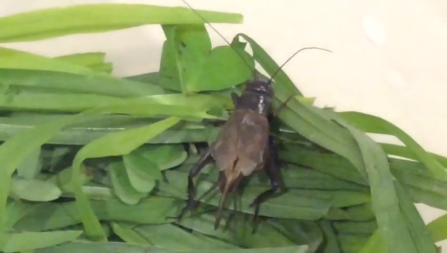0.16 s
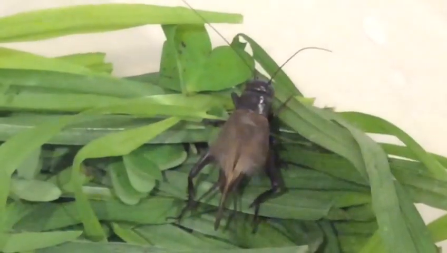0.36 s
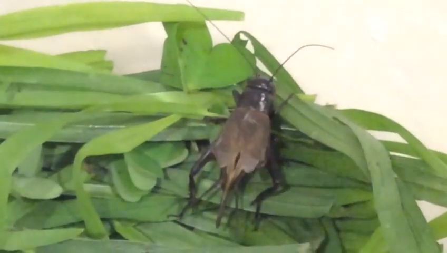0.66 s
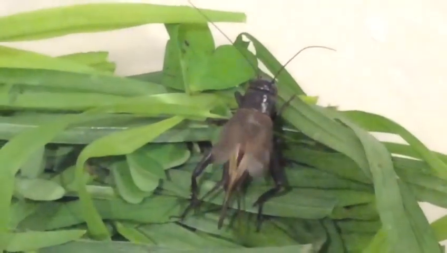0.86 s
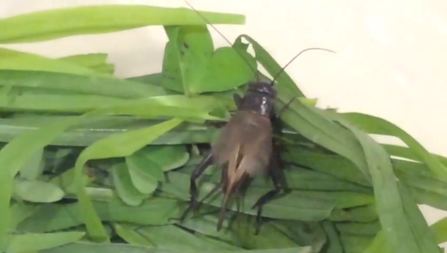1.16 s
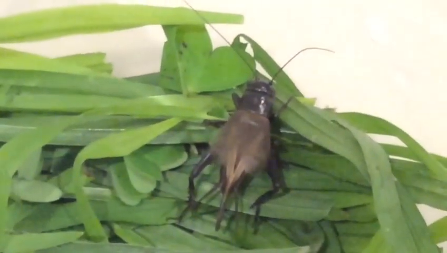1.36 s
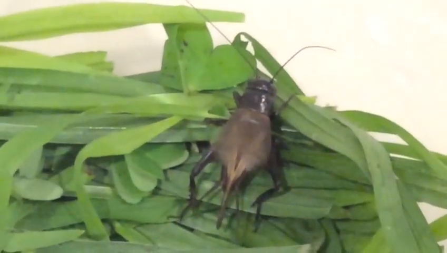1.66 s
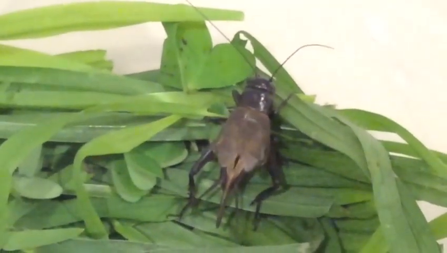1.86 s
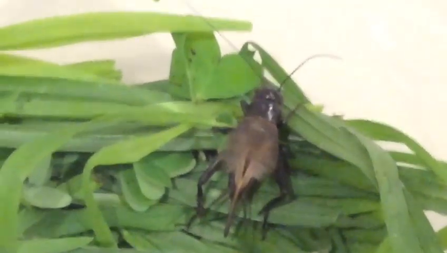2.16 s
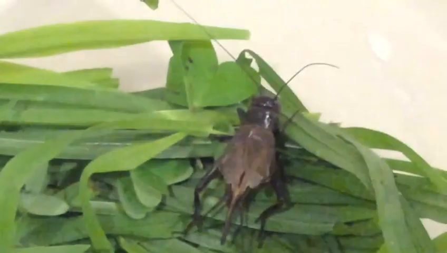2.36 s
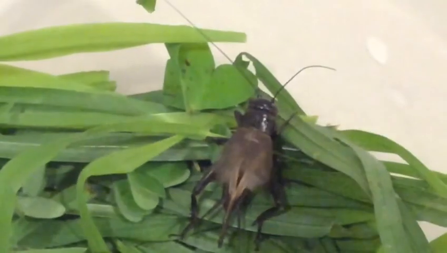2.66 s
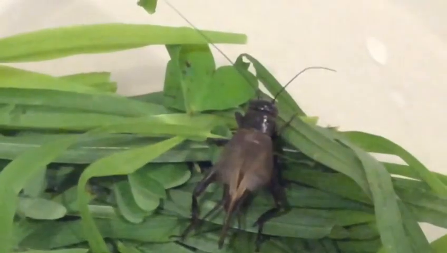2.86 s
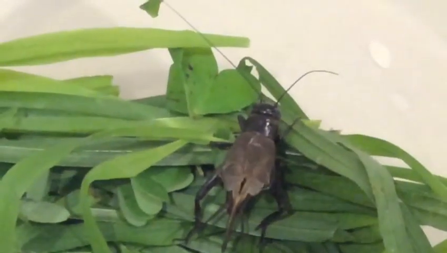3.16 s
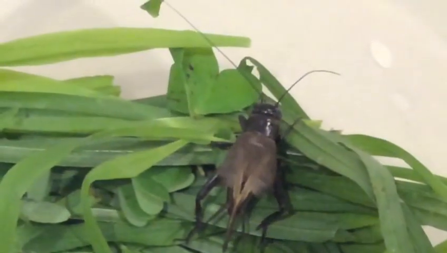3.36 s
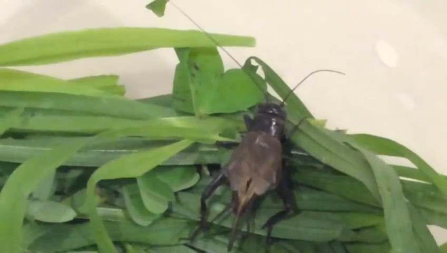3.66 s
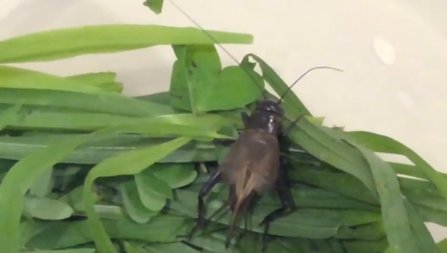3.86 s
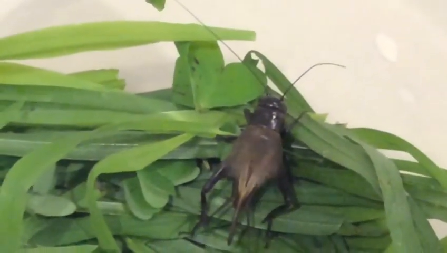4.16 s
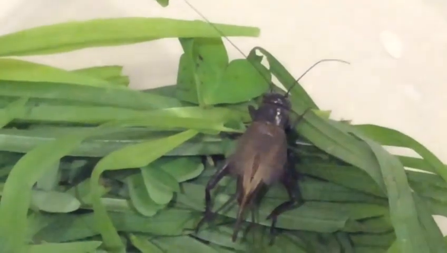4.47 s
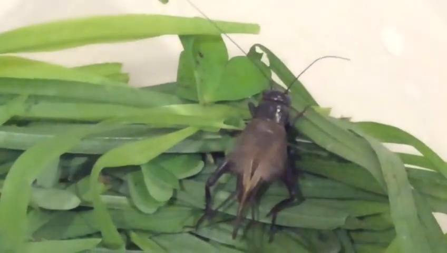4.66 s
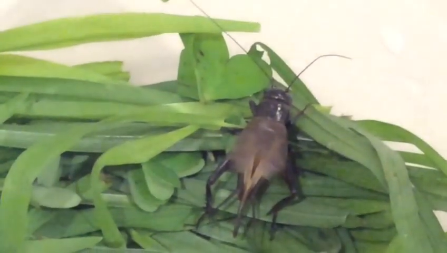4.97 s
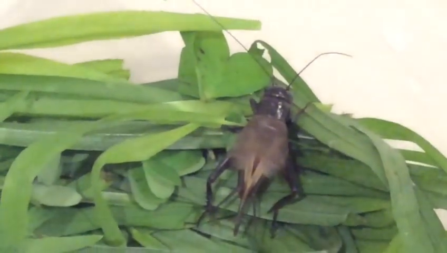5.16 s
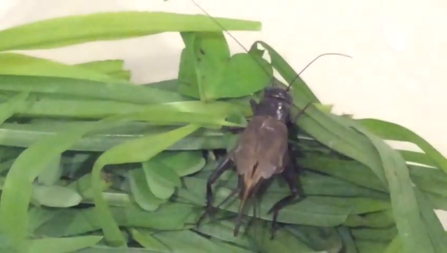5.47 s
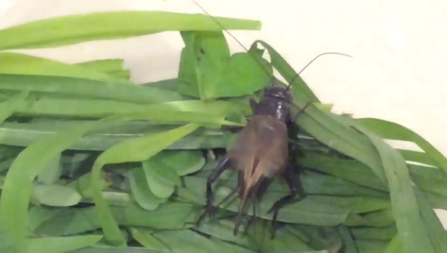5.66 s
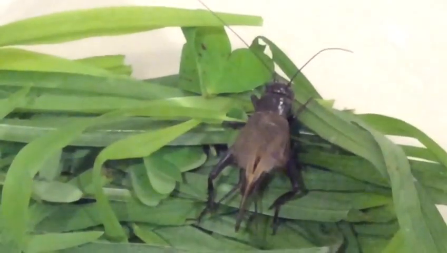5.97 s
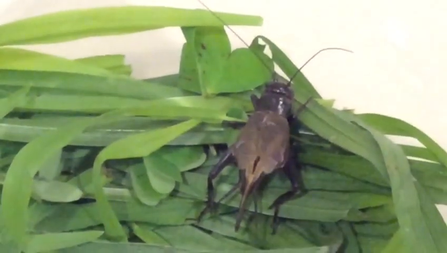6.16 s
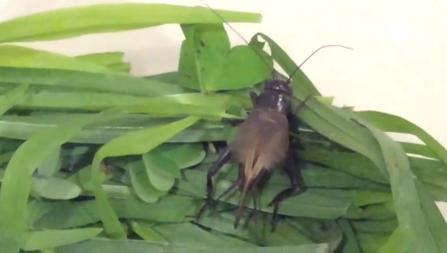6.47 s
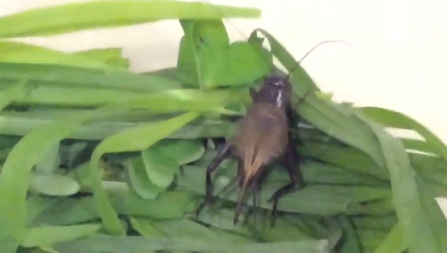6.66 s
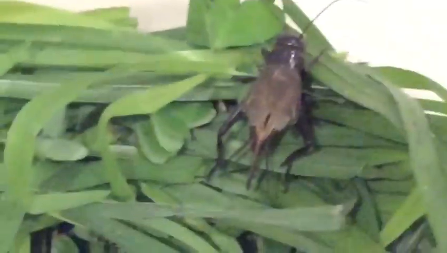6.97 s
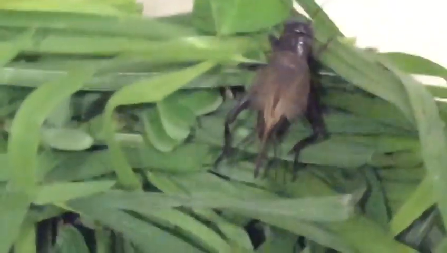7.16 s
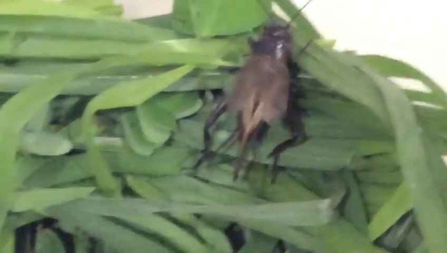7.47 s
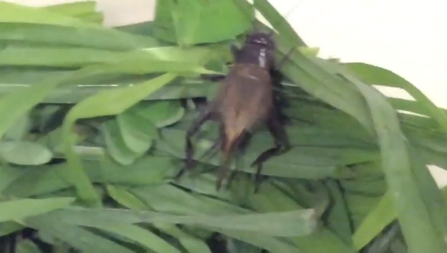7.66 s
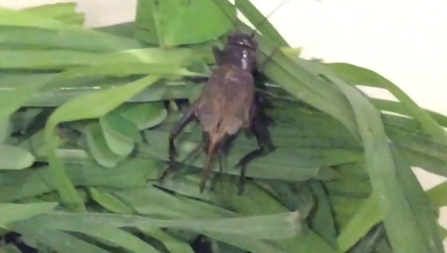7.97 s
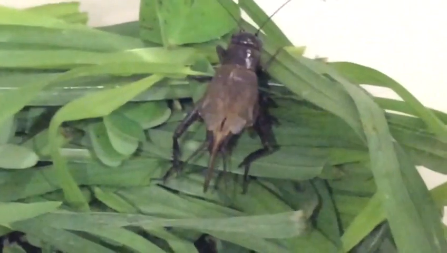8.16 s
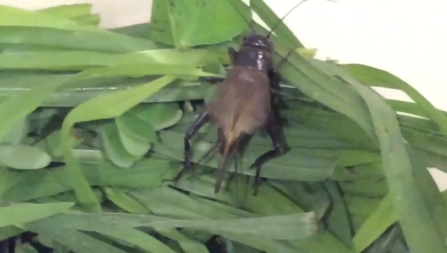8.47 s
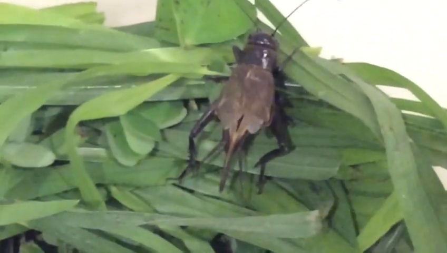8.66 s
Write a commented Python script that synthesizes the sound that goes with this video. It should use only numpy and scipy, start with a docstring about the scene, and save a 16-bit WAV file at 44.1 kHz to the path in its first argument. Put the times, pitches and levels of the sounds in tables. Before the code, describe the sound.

From 0.3 seconds a lone cricket sings close to a hand-held microphone in a tub indoors. Its high, clear tone, around 3.5 kilohertz, comes in short trills of rapid pulses, each drooping slightly in pitch with a beating shimmer and dry, scratchy edge. Trills begin softly, swell over the first pulses, and stop with a faint tub ring and room tail. Longer trills start around 0.85, 3.9 and 7.1 seconds, with slight changes of pace; others are shorter and evenly paced, separated by gaps of about a third of a second. Soft dull hand knocks occur between 0.6 and 2.2, one near 3.6. From 6.7 the case is rubbed; around 7.1 the song grows noticeably louder, with a low finger creak and more bumps until 8.6. The last trill runs from about 8.2 to 8.5, then fading echo, slight rubbing, quiet hum and room hiss.

```python
"""Cricket in a tub

A field cricket sings in a tub indoors, close to a hand-held microphone.
Each wing stroke drags a scraper over a toothed file: a gliding tone sounds through two wing resonances that beat.
Strokes come in trills with a dry rasp; the tub and the room ring faintly after them.
The hand knocks, rubs and creaks on the microphone's case, over soft room noise, a hum and a faint steady ring."""
import sys
import numpy as np
from scipy import signal
from scipy.fft import rfft, irfft, next_fast_len
from scipy.io import wavfile

SR = 44100
rng = np.random.default_rng(int(sys.argv[2]) if len(sys.argv) > 2 else 0)


def unload_wav(signal):
    """Save mono or channel-first audio to the path in sys.argv[1] as 16-bit WAV at rate SR, clipped to [-1, 1]."""
    wavfile.write(
        sys.argv[1],
        SR,
        np.round(np.clip(np.atleast_2d(signal).T, -1, 1) * 32767).astype(np.int16),
    )


N = 388521
TIME = np.arange(N) / SR   # seconds

# runs of evenly paced wing strokes; a trill is one run, or several when the cricket changes pace
# (levels are before the trims in cricket(), the rest before the chance and opening changes):
# first_stroke_end_s, last_stroke_end_s, strokes, peak_db, top_tooth_rate_hz, rate_fall_hz, skid_db, rasp_db
STROKE_RUNS = [(.303, .355, 2, -23.5, 3470, 343, -56, -54.5), (0.425, .596, 4, -25, 3544, 408, -46, -56),
               (0.854, 0.932, 2, -21, 3590, 565, -38, -59.5),
               (1.013, 1.463, 7, -23, 3709, 552, -26.5, -60.5), (1.515, 1.693, 5, -24, 3548, 480, -50, -55),
               (1.968, 2.327, 9, -23.5, 3508, 386, -44, -52),
               (2.639, 2.953, 8, -24.5, 3524, 420, -43.5, -52.5),
               (3.289, 3.563, 7, -24, 3500, 458, -45, -55), (3.91, 3.994, 2, -23.5, 3500, 406, -31, -53),
               (4.069, 4.515, 7, -24.5, 3702, 543, -30, -58.5),
               (4.570, 4.79, 6, -25, 3568, 480, -42, -53.5), (5.008, 5.366, 9, -24, 3528, 404, -43, -53.5),
               (5.690, 6.049, 9, -25, 3535, 430, -41.5, -55), (6.352, 6.681, 8, -24, 3540, 473, -42, -50.5),
               (6.736, 6.798, 2, -21.5, 3590, 516, -40, -62), (7.102, 7.181, 2, -16, 3648, 450, -36, -55.5),
               (7.264, 7.711, 7, -18.5, 3682, 427, -33.5, -59.5),
               (7.776, 7.862, 3, -18.5, 3540, 418, -33.5, -53), (8.266, 8.529, 7, -21, 3506, 392, -62, -54)]
# the wing resonances, one broad and one sharp: pitch_hz, width_hz, relative_level_db
WING_RESONANCES = [(3447, 392, 0), (3610, 10, 9.7)]
# tone colour of the scraping file: pitch_hz, relative_level_db
RASP_COLOUR = [(1000, -23), (1500, -10.5), (2000, -10), (2700, 3.5), (3500, 22), (3800, -3), (4250, 15),
               (5000, 5), (6000, -4), (7200, -1), (8500, -3.5), (10000, -6.5), (11500, -8), (12500, -23)]
# the two pitches that split the rasp into low, middle and high: pitch_hz
RASP_SPLITS_HZ = [5500, 8500]
# soft knocks of the hand on the case (levels before the trims in hand()): peak_s, level_db, thud_pitch_hz
HAND_KNOCKS = [(0.574, -50, 88.8), (0.823, -45.5, 101), (0.842, -41, 192), (0.908, -46.5, 134),
               (1.05, -49, 129), (1.963, -46.5, 80), (2.027, -38, 132), (2.081, -40, 141),
               (2.166, -41.5, 190), (2.242, -45.5, 171), (3.567, -45.5, 280), (7.083, -41.5, 161),
               (7.372, -41.5, 158), (7.758, -37.5, 94.2), (7.826, -45.5, 110), (8.026, -37.5, 412),
               (8.079, -43.5, 327), (8.491, -39.5, 174), (8.538, -44, 245), (8.561, -39, 110),
               (8.577, -46, 127)]
# tone colour of the scuff in each knock: pitch_hz, relative_level_db
SCUFF_COLOUR = [(18, -51), (30, -34), (102, -5), (204, -8.5), (322, -18.5), (412, -19), (754, -35.5),
                (1010, -34.5), (1500, -32.5), (1950, -58), (3300, -120)]
# rubs of the hand on the case: start_s, length_s, level_db
HAND_RUBS = [(6.74, 0.21, -55.5), (7.016, 0.24, -55.5), (7.188, 0.32, -56.5), (7.7, 0.22, -56.5),
             (8.555, 0.043, -46.5), (8.69, 0.17, -64.5)]
# low tone colour of the rubbed case: pitch_hz, relative_level_db
CASE_COLOUR = [(18, -66), (30, -23), (106, 4.5), (134, -12.5), (295, -7.5), (377, -16), (440, -15),
               (732, -31.5), (1200, -45), (1560, -77), (2640, -120)]
# creaks of a finger sliding on the case: start_s, length_s, slips_per_s, level_db
FINGER_CREAKS = [(7.079, .32, 120, -53), (8.66, 0.23, 100, -68)]
# tone colour of room rumble and hiss: pitch_hz, relative_level_db
AIR_COLOUR = [(25, -21), (45, 2.5), (90, 1.5), (140, 1.5), (220, -4), (400, -14), (700, -20.5), (1200, -23),
              (2400, -23), (4500, -21), (7000, -27), (11000, -28), (12500, -75)]

STROKE_S, STROKE_SHARE = 0.0063, .51   # a stroke lasts this long plus a share of the pace
REST_S = .15   # a longer gap than this separates two trills
WARM_UP_STROKES = 1.1   # the wings reach full swing over about this many strokes
# the first stroke of a trill: its length, its lower tooth rate, the share of the fall it lacks
OPENING_S, OPENING_DROP_HZ, OPENING_FLATNESS = .034, 124.4, 0.32
# and its change in each level
OPENING_DB, OPENING_SKID_DB, OPENING_RASP_DB, OPENING_SECOND_DB = -5, -32, -4.5, 2
CLOSING_DB, CLOSING_LAG_S = -2, .002   # the last stroke of a trill is softer and late
# overtones; the third grows with the tooth rate
SECOND_DB, THIRD_DB, THIRD_DB_PER_HZ, USUAL_HZ = -57.5, -68, 0.0427, 3500
# chance differences from stroke to stroke (typical spread)
VARY_HZ, VARY_FALL_HZ, VARY_DB = 13.1, 36.2, 1.23
VARY_SKID_DB, VARY_RASP_DB, VARY_OVERTONE_DB = 3, 3.44, 2.26
# where in the stroke the scraper skids, for what share of it, and how much drive that costs
SKID_FROM, SKID_SHARE, SKID_GRIP_LOSS = .22, .36, 3.9
RETURN_S, RETURN_DB = .028, -7.5   # the wings brush lightly on their way back, relative to the rasp
CREAK_RISE = 0.14   # the slips speed up by this share as the finger slides
TUB_T60_S, TUB_DB, ROOM_T60_S, ROOM_DB = 0.084, -8, 0.69, -14   # T60: time to die away by 60 dB
AIR_DB, HUM_DB, HUM_HZ = -63.5, -69, 137.3
CUTOFF_HZ = 12200


def cricket(tone_db=0.83, skid_db=-7.5, scrape_db=6.5, tick_db=-46.5, overtone_crest=0.47,
            overtone_focus=1.2, skid_rasp_db=-31.5, rasp_crest=0.9, rasp_focus=.5):
    """Stroke by stroke: a gliding tone through the wings with its overtones and skid, and the rasp of the file."""
    fastest, swell = 0.3884, 1.34   # point in the stroke of the top rate; how steeply the force builds
    lift_s, skid_jitter_hz = 0.00076, 105
    jitter_hz, shimmer_db = 18, .7
    song, rasp = np.zeros((2, N))
    wobble = drift(270)
    pressure = from_db(shimmer_db * drift(580))
    last_end = 0
    for end, length, top_hz, fall_hz, peak, skid_level, rasp_level, second_level in strokes():
        start = end - length
        u = np.linspace(0, 1, round(length * SR))   # progress through the stroke
        now = round(start * SR) + np.arange(len(u))

        # early in the stroke the scraper skids and loses some of its grip
        skid = np.clip((u - SKID_FROM) / SKID_SHARE, 0, 1)
        grip_loss = min(SKID_GRIP_LOSS * from_db(skid_level - peak), 1)
        grip = 1 - grip_loss * np.sin(np.pi * skid ** 2)
        add(song, start, from_db(skid_level + skid_db) * squeal(skid, skid_jitter_hz * wobble[now]))
        add(rasp, start, from_db(skid_level + skid_rasp_db) * np.sin(np.pi * np.sqrt(skid)))

        # the wing speeds up, then brakes until the scraper lifts off
        slowing = ((u - fastest) / (1 - fastest)) ** 2
        rate_hz = top_hz - fall_hz * slowing + jitter_hz * wobble[now]
        phase = 2 * np.pi * np.cumsum(rate_hz) / SR
        lift_off = np.minimum((1 - u) * length / lift_s, 1)
        force = u ** swell * lift_off * grip * pressure[now]
        add(song, start, from_db(peak + tone_db) * wing_tone(force * np.sin(phase)))

        third_level = THIRD_DB + THIRD_DB_PER_HZ * (top_hz - USUAL_HZ)
        overtone_db = [second_level, third_level] + VARY_OVERTONE_DB * rng.standard_normal(2)
        second, third = from_db(overtone_db)
        overtones = second * np.sin(2 * phase) + third * np.sin(3 * phase)
        overtone_shape = rms_one(arch(u, overtone_crest) ** overtone_focus)
        add(song, start, np.sqrt(2) * overtones * overtone_shape * pressure[now])

        # the rasp grows as the scraper bears down, and returns faintly on the way back
        scrape = from_db(rasp_level + scrape_db)
        add(rasp, start, scrape * rms_one(arch(u, rasp_crest) ** rasp_focus))
        add(rasp, end, scrape * from_db(RETURN_DB) * np.hanning(round(RETURN_S * SR)))

        # after a rest the wings open with a faint tick
        if start - last_end > REST_S:
            add(rasp, start - .010, from_db(tick_db) * np.hanning(SR // 400))
        last_end = end
    return song, colour(rasp * grit(), RASP_COLOUR)


def strokes():
    """List every wing stroke: end s, length s, top Hz, fall Hz, peak dB, skid dB, rasp dB, second overtone dB."""
    rows, sung, previous = [], 0, -1
    next_starts = [run[0] for run in STROKE_RUNS[1:]] + [np.inf]
    for run, following in zip(STROKE_RUNS, next_starts):
        first, last, count, peak, top_hz, fall_hz, skid, rasp = run
        count = round(count)
        u = np.linspace(0, 1, count)   # progress through the run
        if first - previous > REST_S:
            sung = 0   # a new trill starts
        # 1 on the first stroke of a trill, fading over the next few
        opening = np.exp(-((sung + np.arange(count)) / WARM_UP_STROKES) ** 2)
        closing = (u == 1) * (following - last > REST_S)
        length = STROKE_S + STROKE_SHARE * (last - first) / (count - 1)
        chance = rng.standard_normal((count, 5)).T
        rows.extend(zip(first + (last - first) * u + CLOSING_LAG_S * closing,
                        length + (OPENING_S - length) * np.sqrt(opening),
                        top_hz - OPENING_DROP_HZ * opening + VARY_HZ * chance[0],
                        fall_hz * (1 - OPENING_FLATNESS * opening) + VARY_FALL_HZ * chance[1],
                        peak + OPENING_DB * opening + CLOSING_DB * closing + VARY_DB * chance[2],
                        skid + OPENING_SKID_DB * opening + VARY_SKID_DB * chance[3],
                        rasp + OPENING_RASP_DB * opening + VARY_RASP_DB * chance[4],
                        SECOND_DB + OPENING_SECOND_DB * opening))
        sung, previous = sung + count, last
    return rows


def wing_tone(drive):
    """The broad resonance follows the glide; the sharp one rings on and beats with it. Peak 1."""
    # after the stroke the ringing is damped as the wings part
    fade = np.exp(-np.arange(SR // 5) / (.022 * SR))
    damping = np.pad(fade, (len(drive), 0), mode="edge")
    drive = np.pad(drive, (0, SR // 5))
    tone = 0
    for k, (hz, width_hz, db) in enumerate(WING_RESONANCES):
        sign = (-1) ** k   # the two swing against each other
        tone = tone + sign * from_db(db) * resonate(drive, hz, width_hz)
    tone = damping * tone
    return tone / np.abs(tone).max()


def squeal(v, wobble_hz, from_hz=3810, drop_hz=80):
    """The skid (v from 0 to 1): a short, ragged tone just above the song's pitch."""
    rate_hz = from_hz - drop_hz * v + wobble_hz
    return np.sqrt(2) * np.sin(np.pi * v) * np.sin(2 * np.pi * np.cumsum(rate_hz) / SR)


def grit():
    """Teeth tick and the scraper catches in short runs: flickering noise, partly separate in three bands."""
    grain_db, catch_db, own_db = 2.0, 4.3, 2.6
    shared = from_db(grain_db * drift(700) + catch_db * drift(55))
    bands = [(RASP_SPLITS_HZ[0], "low"), (RASP_SPLITS_HZ, "band"), (RASP_SPLITS_HZ[1], "high")]
    hiss = 0
    for hz, kind in bands:
        band_filter = signal.butter(2, hz, kind, fs=SR, output="sos")
        band = signal.sosfilt(band_filter, rng.standard_normal(N))
        hiss = hiss + band * from_db(own_db * drift(90))
    return rms_one(shared * hiss)


def echoes(x, t60_s, delay_s):
    """Dense reflections that begin after a delay and die away; unit energy."""
    t = np.arange(SR) / SR
    onset = np.clip(t / delay_s - 1, 0, 1)
    response = rng.standard_normal(SR) * from_db(-60 * t / t60_s) * onset
    return signal.fftconvolve(x, response / np.linalg.norm(response))[:N]


def hand(knock_db=-4.5, thud_db=2.0, rise_s=0.0031, knock_t60_s=0.094, thud_cycles=9.5):
    """Dull knocks, each a short thud with a scuff, and a low rubbing, carried through the case."""
    thuds, scuffs = np.zeros((2, N))
    t = np.arange(SR // 3) / SR
    attack = np.minimum(t / rise_s, 1)
    for peak_s, db, hz in HAND_KNOCKS:
        # a thud dies away by 60 dB in a set number of cycles
        thud = from_db(db + thud_db - 60 * t * hz / thud_cycles) * np.sin(2 * np.pi * hz * t)
        add(thuds, peak_s - rise_s, attack * thud)
        add(scuffs, peak_s - rise_s, attack * from_db(db + knock_db - 60 * t / knock_t60_s))
    rubbing = sum(from_db(db) * slide(start_s, length_s) for start_s, length_s, db in HAND_RUBS)
    return thuds + scuffs * noise(SCUFF_COLOUR) + rubbing * noise(CASE_COLOUR)


def creak():
    """Skin sticks and slips on the case: a soft, quickening pulse train in the case's low colour."""
    out = 0
    for start_s, length_s, rate, db in FINGER_CREAKS:
        progress = np.clip((TIME - start_s) / length_s - .5, -.5, .5)
        rate_hz = rate * (1 + CREAK_RISE * progress)
        slips = np.diff(np.floor(np.cumsum(rate_hz) / SR), prepend=0)   # one click per slip
        out = out + from_db(db) * slide(start_s, length_s) * rms_one(colour(slips, CASE_COLOUR))
    return out


def slide(start_s, length_s):
    """The pressure of a sliding hand: it swells to 1 and fades."""
    return np.sin(np.pi * np.clip((TIME - start_s) / length_s, 0, 1))


def background(ring_db=-70.5):
    """Room air as coloured noise, a wavering hum, and a faint steady ring of noise near the song's pitch."""
    hum = np.sqrt(2) * np.sin(2 * np.pi * np.cumsum(HUM_HZ + 1.25 * drift(2.48)) / SR)
    ring = rms_one(resonate(resonate(rng.standard_normal(N), 3280, 300), 3280, 300))
    return from_db(AIR_DB) * noise(AIR_COLOUR) + from_db(HUM_DB) * hum + from_db(ring_db) * ring


def from_db(db):
    """Decibels to gain."""
    return 10 ** (np.asarray(db) / 20)


def rms_one(x):
    """Scale to an average strength (rms) of 1."""
    return x / np.sqrt(np.mean(x ** 2) + 1e-20)


def add(out, start_s, sound):
    """Mix a sound in from a given time."""
    i = max(round(start_s * SR), 0)
    out[i:i + len(sound)] += sound[:max(N - i, 0)]


def resonate(x, hz, width_hz):
    """A resonance with gain 1 on top; the narrower it is, the longer it rings."""
    r = np.exp(-np.pi * width_hz / SR)
    feed = np.array([1, 0, -1]) * (1 - r * r) / 2
    return signal.lfilter(feed, [1, -2 * r * np.cos(2 * np.pi * hz / SR), r * r], x)


def colour(x, spectrum):
    """Shape a sound by (Hz, dB) points, keeping the power of white noise."""
    size = next_fast_len(len(x))
    hz, db = np.transpose(spectrum)
    log_hz = np.log(np.fft.rfftfreq(size, 1 / SR) + 1)
    gain = from_db(np.interp(log_hz, np.log(hz), db))
    return irfft(rfft(x, size) * rms_one(gain), size)[:len(x)]


def noise(spectrum):
    """Coloured noise with an average strength of about 1."""
    return colour(rng.standard_normal(N), spectrum)


def drift(rate_hz):
    """Smooth random wander of unit spread."""
    smoother = signal.butter(2, rate_hz, fs=SR, output="sos")
    return rms_one(signal.sosfilt(smoother, rng.standard_normal(N)))


def arch(u, crest):
    """A smooth hump of unit rms over a stroke (u from 0 to 1), highest at the crest."""
    bent = np.interp(u, [0, np.clip(crest, .05, .95), 1], [0, .5, 1])
    return rms_one(np.sin(np.pi * bent))


def scene(rim_hz=3490, rim_width_hz=5.0, rim_db=-6.0, spread_hz=3500, spread_width_hz=300, rasp_room_db=-11.5):
    """The cricket with quick echoes and a thin ring from the tub, a longer room tail, the hand and the background."""
    tub_delay_s, room_delay_s, scatter_db = .003, .008, -11
    song, rasp = cricket()
    tub = echoes(from_db(TUB_DB) * song + from_db(scatter_db) * rasp, TUB_T60_S, tub_delay_s)
    rim = from_db(rim_db) * resonate(song, rim_hz, rim_width_hz)
    # the room is fed mostly by the upper part of the glide, where the wings radiate best
    spread = from_db(ROOM_DB) * resonate(song, spread_hz, spread_width_hz) + from_db(rasp_room_db) * rasp
    room = echoes(spread, ROOM_T60_S, room_delay_s)
    return (song + rasp + tub + rim + room + hand() + creak() + background())[None]


def record(dry):
    """The top is cut steeply."""
    return signal.sosfilt(signal.ellip(10, .2, 70, CUTOFF_HZ, fs=SR, output="sos"), dry)


dry = scene()
out = record(dry)
unload_wav(out)
```